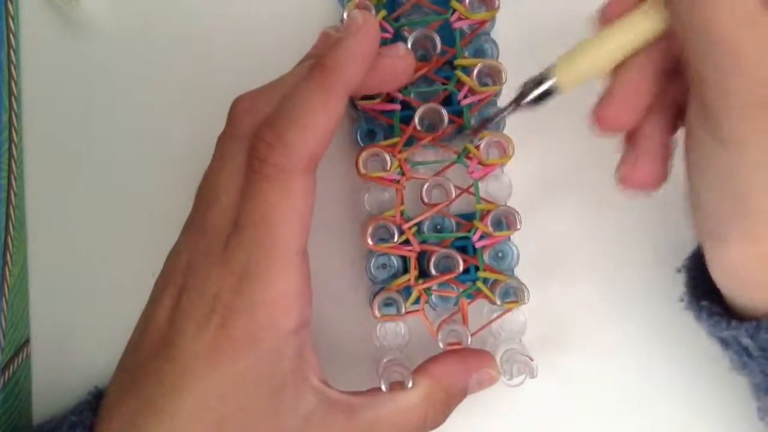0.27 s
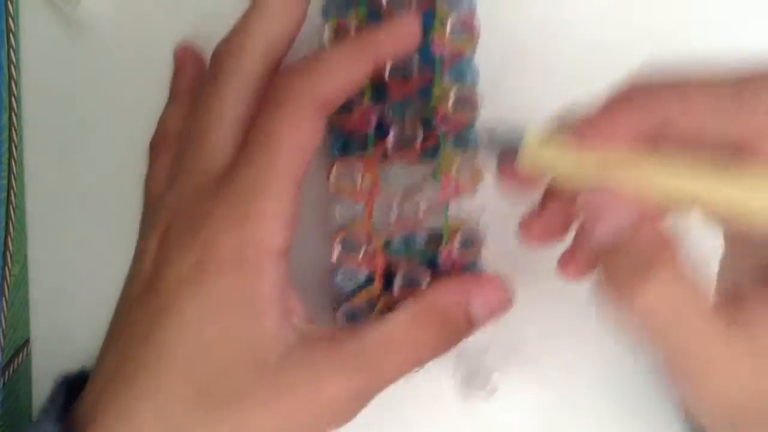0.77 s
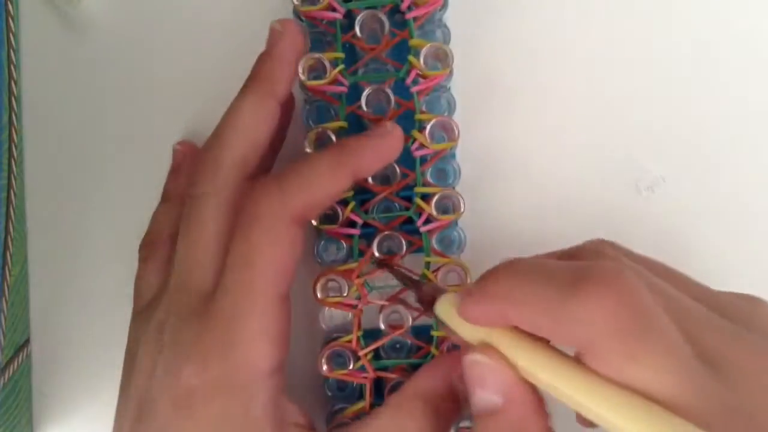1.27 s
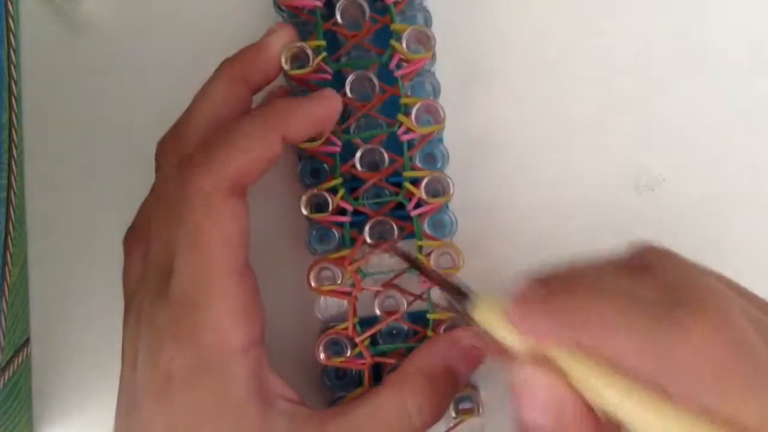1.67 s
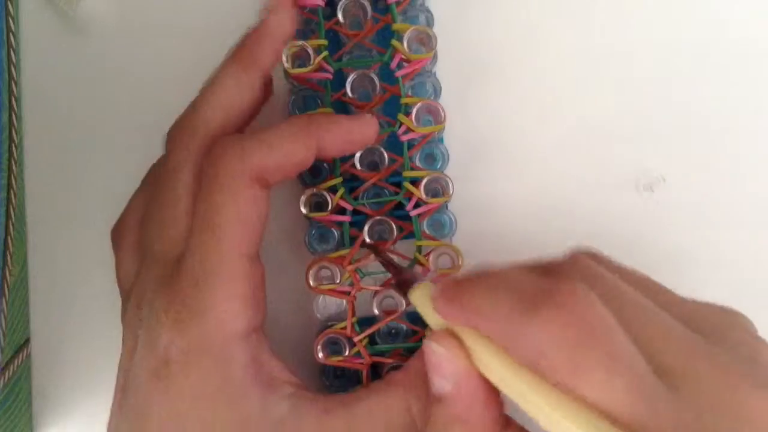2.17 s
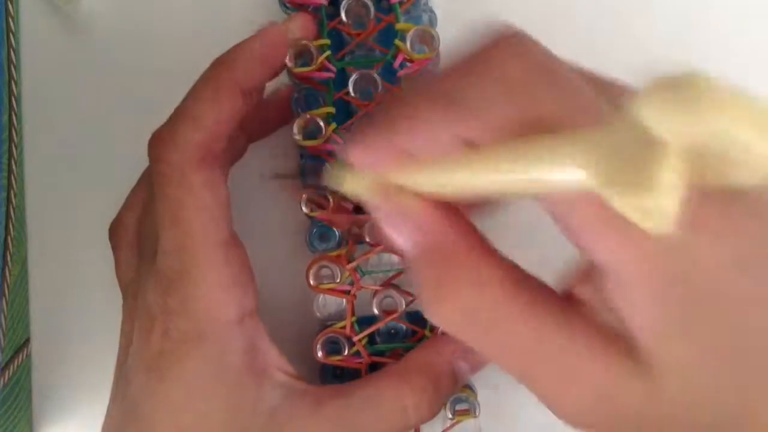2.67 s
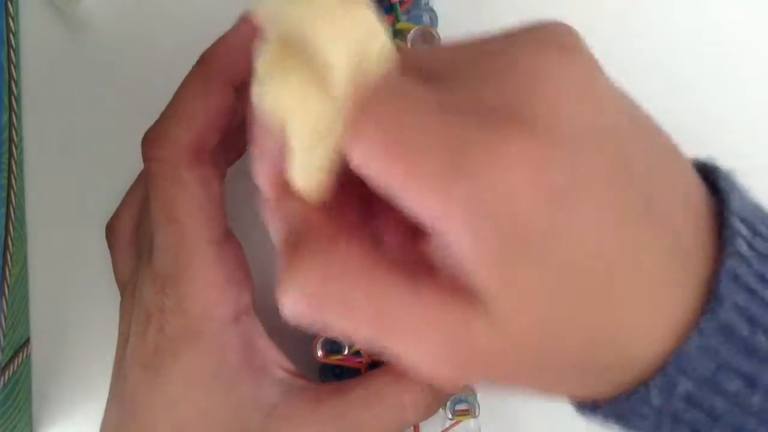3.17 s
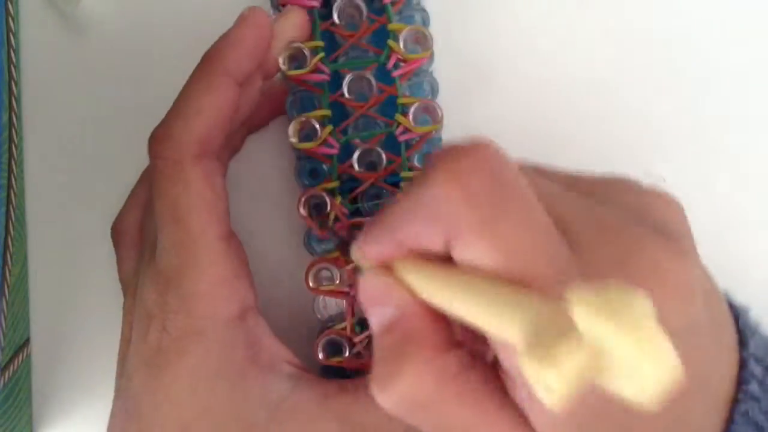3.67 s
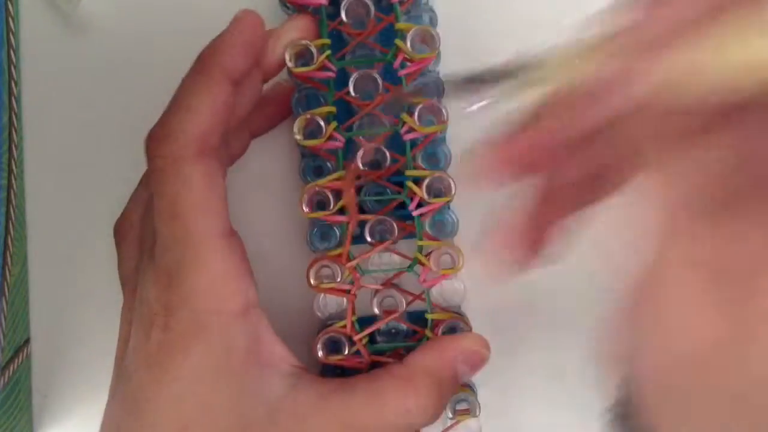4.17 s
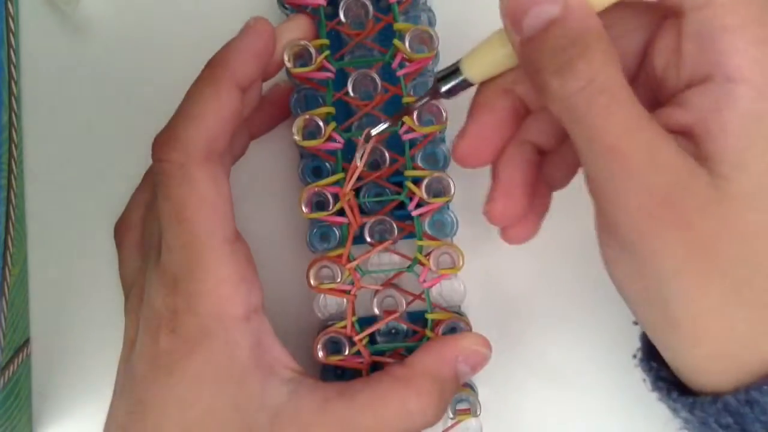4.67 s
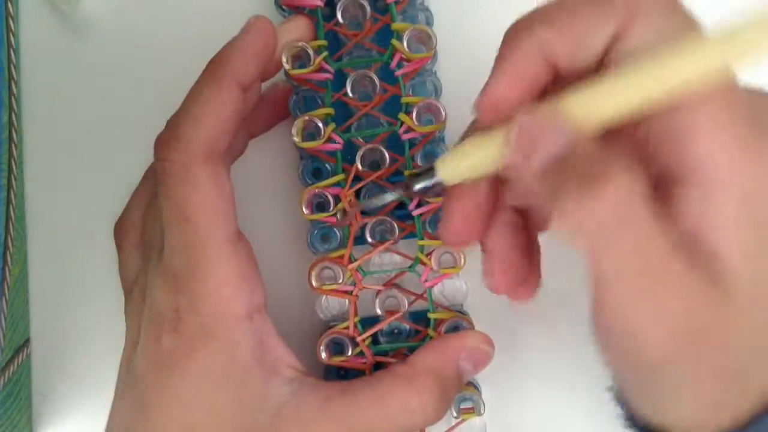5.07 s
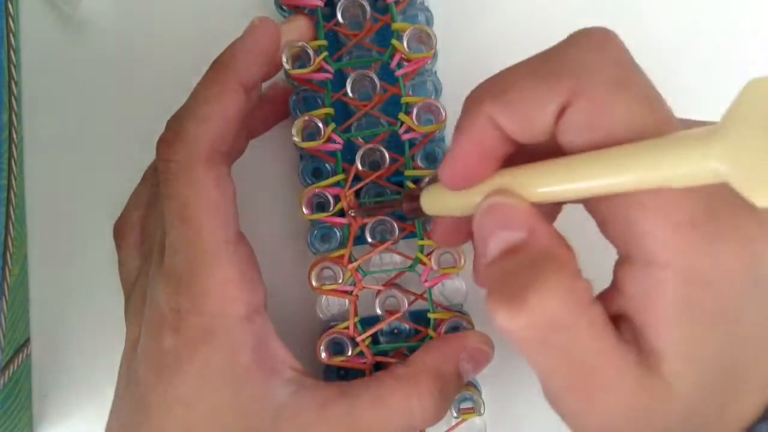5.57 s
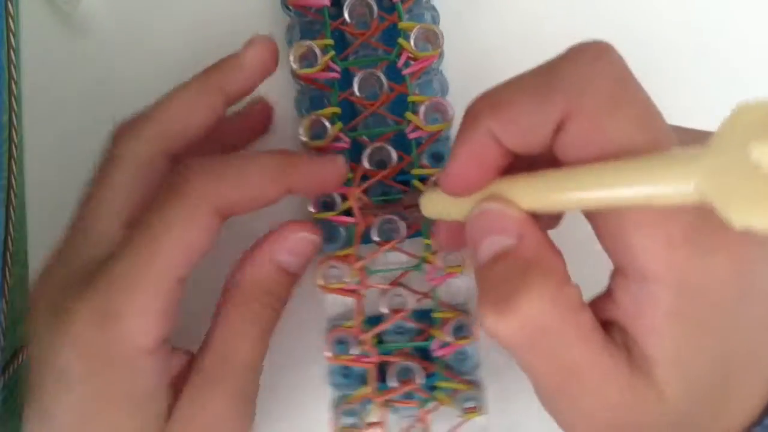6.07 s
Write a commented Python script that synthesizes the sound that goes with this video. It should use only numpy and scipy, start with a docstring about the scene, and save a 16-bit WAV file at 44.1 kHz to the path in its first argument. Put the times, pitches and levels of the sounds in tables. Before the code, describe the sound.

A metal hook works rubber bands over the pins of a plastic loom, close by in a quiet room with a faint hiss and hum. Small clicks come at 0.2 and 0.3 seconds. The loom knocks and rattles on the table between 0.3 and 0.7 seconds and scrapes along in two short shoves, ending around 1 second. Light, uneven clicks follow, each with a brief plastic ring, clearer at 1.5 and 1.8 seconds. The loudest sound, a sharp snap, comes at 2.7 seconds. Further distinct clicks land near 3.1, 3.7, 4.1 and 4.9 seconds, with softer ticks between. Fingers rub the plastic very faintly, and a sleeve brushes past around 0.6, 2.6 and 3.6 to 3.9 seconds. After a short lull, the loom rocks on the table with three hollow, rattling knocks between 5.8 and 6.2 seconds.

```python
"""In a quiet room, at a table, a metal hook lifts rubber bands over the pins of a plastic loom.
Hook and bands click on the pins and set the loom ringing. The loom knocks and rocks on the table
when the hand changes grip, and scrapes as it is pushed along in two shoves. Fingers rub the plastic
and a sleeve brushes past. A faint hum and hiss lie underneath."""
import sys
import numpy as np
from scipy import signal
from scipy.fft import rfft, irfft, next_fast_len
from scipy.io import wavfile
from scipy.ndimage import uniform_filter1d

SR = 44100
rng = np.random.default_rng(int(sys.argv[2]) if len(sys.argv) > 2 else 0)


def unload_wav(signal):
    """Save mono or channel-first audio to the path in sys.argv[1] as 16-bit WAV at rate SR, clipped to [-1, 1]."""
    wavfile.write(
        sys.argv[1],
        SR,
        np.round(np.clip(np.atleast_2d(signal).T, -1, 1) * 32767).astype(np.int16),
    )


N = 278712
NOW = np.arange(N) / SR   # seconds through the scene
RING = np.arange(SR // 3) / SR   # seconds through one blow

# A mode is a tone that a struck thing rings at; ring_s is the time it takes to fade by 60 dB.
# modes of the loom's bending body: pitch_hz, level_db, ring_s
BODY_MODES = [(298.6, -4.5, 0.2), (360, -2, 0.057), (375, -5, 0.13), (430, -3.5, 0.059), (469.3, -5, 0.11),
              (498.3, -3, 0.12), (612, -7.5, 0.11), (668.4, -3.5, 0.197), (774, 4, 0.036)]
# modes of the loom's ribs and pin strips: pitch_hz, level_db, ring_s
RIB_MODES = [(780.3, -10, 0.094), (821, -9.5, 0.09), (958, -2.5, 0.017), (1057.5, -3.5, 0.032),
             (1069.3, -6.5, 0.11), (1159.5, -6, 0.04), (1306, -2, 0.026), (1412, -2, 0.031),
             (1537, -17, 0.08), (1579, 0, 0.027), (1800, -7.5, 0.079)]


def from_db(db):
    """Turn decibels into a number to multiply a sound by."""
    return 10 ** (np.asarray(db) / 20)


def rms_one(x):
    """Scale a sound so that its average strength (rms) is 1."""
    return x / np.sqrt(np.mean(x ** 2) + 1e-20)


def unit_blow(x):
    """Scale a blow so that its loudest 2 ms have the power of a sine wave of height 1."""
    return x / np.sqrt(2 * uniform_filter1d(x ** 2, size=88).max() + 1e-20)


def at_hz(points, hz):
    """Read between the rows of a table, giving each octave equal space."""
    pitches, values = np.transpose(points)
    return np.interp(np.log(np.maximum(hz, 1)), np.log(pitches), values)


def coloured(x, spectrum):
    """Make each pitch range as strong as the spectrum table says; rms 1."""
    size = next_fast_len(len(x))
    gains = from_db(at_hz(spectrum, np.fft.rfftfreq(size, 1 / SR)))
    return rms_one(irfft(rfft(x, size) * gains, size)[:len(x)])


def noise(spectrum, size):
    """Random noise shaped by a spectrum table; rms 1."""
    return coloured(rng.standard_normal(size), spectrum)


def dying(ring_s):
    """The fade of a blow: 60 dB down after ring_s."""
    return from_db(-60 * RING / max(ring_s, 1e-3))


def add(out, start_s, sound):
    """Mix a sound in at its start time."""
    start = max(round(start_s * SR), 0)
    out[start:start + len(sound)] += sound[:max(N - start, 0)]


def struck(modes, favoured_hz, focus_db, damping=1):
    """The spot that is hit favours one pitch; modes lose focus_db for each octave away from it."""
    hz, db, ring_s = np.transpose(modes)
    db = db - focus_db * np.abs(np.log2(hz / favoured_hz)) + rng.standard_normal(len(hz))
    hz = hz * (1 + 0.0074 * rng.standard_normal(len(hz)))   # fingers and bands detune it a little
    strengths = from_db(db) * rng.choice([-1, 1], len(hz))
    tones = (strength * np.sin(2 * np.pi * pitch * RING) * dying(seconds / damping)
             for strength, pitch, seconds in zip(strengths, hz, ring_s))
    return unit_blow(sum(tones))


def burst(spectrum, ring_s):
    """A contact wakes a crowd of short tones that blur into fading noise."""
    return unit_blow(noise(spectrum, len(RING)) * dying(ring_s))


def slips(per_s, spread_db):
    """Rubbing surfaces stick and slip: tiny, uneven jolts at random moments."""
    moments = rng.random(N) < per_s / SR
    return moments * from_db(spread_db * rng.standard_normal(N)) * rng.choice([-1, 1], N)


def swells(strokes, lag_s=0):
    """Each stroke speeds up and slows down; it stays above half strength for length_s."""
    return sum(from_db(db) * .5 ** ((2 * (NOW - middle_s - lag_s) / length_s) ** 2)
               for middle_s, length_s, db in strokes)


def friction(jolts, favoured_hz, rib_db):
    """A stream of jolts keeps the loom's body and ribs ringing; rms 1."""
    body = struck(BODY_MODES, favoured_hz, focus_db=16)
    ribs = from_db(rib_db) * struck(RIB_MODES, favoured_hz, focus_db=8)
    return rms_one(signal.fftconvolve(jolts, body + ribs)[:N])


def hiss_and_hum():
    """The still room: an even hiss and a low, wavering hum."""
    # spectrum of the hiss: pitch_hz, level_db
    hiss_spectrum = [(15, -83.5), (25, -30.5), (53, -18.5), (69, -37), (129, -15), (144, -9.5), (160, -8.5),
                     (215, -11.5), (274, -17), (1270, -25), (1850, -26), (4150, -26.5), (4750, -26.5),
                     (10600, -27), (15500, -29.5)]
    # tones of the hum: pitch_hz, waver_hz, level_db
    hum_tones = [(81.2, 2.4, -80.5), (163.3, 6.5, -76), (206, 3.2, -77)]
    hiss = noise(hiss_spectrum, N)
    above_hum = signal.sosfilt(signal.butter(2, 300, "high", fs=SR, output="sos"), hiss)
    out = from_db(-69.5) * hiss / np.std(above_hum)   # the part above 300 Hz sets the level
    for hz, waver_hz, db in hum_tones:
        waver = noise([(1, 0), (waver_hz, -3), (waver_hz * 4, -30), (400, -90)], N)
        out += from_db(db) * rms_one(np.sin(2 * np.pi * hz * NOW + 0.46 * waver))
    return out


def clicks():
    """A band or the hook slips off a pin: a crack, the pin's brief ring, and the loom sounding below."""
    # snaps on the pins: start_s, level_db, pitch_hz, loom_db, rib_db, crack_db
    # loom_db and crack_db turn those parts up against the pin; rib_db tips the loom from body to ribs
    snaps = [(0.171, -35, 4600, -18.5, -13, 0.5), (0.1909, -33, 4130, -15, -13, -11),
             (0.3244, -26, 3640, -13, -13, -11), (1.2161, -38.5, 3260, -14, -9.5, -33),
             (1.4431, -54.5, 3320, -2, -4, -3), (1.4636, -31.5, 4330, -24, -1, -15.5),
             (1.4739, -31.5, 4400, -15, -3, -14), (1.6592, -67.5, 2860, 3.5, 1, -9),
             (1.7854, -28.5, 3830, -8.5, -3, -7), (1.8295, -50.5, 4290, -9.5, -5, -4),
             (1.8552, -46, 4150, -11, -4.5, -10), (2.0479, -46, 3860, -9.5, -10, -5.5),
             (2.1686, -41, 4160, -11.5, -7.5, -13.5), (2.3099, -51.5, 3750, -7.5, -6.5, -22),
             (2.385, -53.5, 4030, -9, 3.5, -11.5), (2.5092, -49.5, 3200, -18, 11, -23),
             (2.6587, -12, 5010, -20.5, 3, -17.5), (2.8983, -48.5, 3300, -17.5, 5.5, -30),
             (3.053, -25.5, 3200, -25.5, 5.5, -30), (3.111, -36.5, 4350, -9.5, -6, -13),
             (3.242, -43, 3200, -15.5, 6.5, -12), (3.266, -40, 3530, -17.5, 2.5, -23),
             (3.3361, -40, 4800, -6, -6, 2), (3.369, -48, 3100, -5, -8.5, -12),
             (3.476, -49, 4130, -10.5, -3.5, -13), (3.746, -23, 2650, -6.5, 5, -7),
             (4.08, -28.5, 3540, -15, 4.5, -7.5), (4.1128, -28.5, 3250, -13, -0.5, -14.5),
             (4.1687, -39.5, 4170, -16, 3, -8), (4.6158, -45, 4060, -13, 1, -11),
             (4.805, -43, 4630, -8.5, -12, -5.5), (4.8536, -63.5, 3310, 2.5, 4.5, -10),
             (4.92, -21.5, 4500, -17.5, -4, -7), (5.832, -47, 3610, -14, 4.5, -1.5),
             (6.227, -34, 2840, -11, 19, -22)]
    # modes of the hook and pins: pitch_hz, level_db, ring_s
    pin_modes = [(2550, 4, 0.0051), (2586, -43, 0.0201), (2987, -5.5, 0.034), (3150, -4, 0.027),
                 (3430, -3, 0.035), (4167, 3, 0.03), (4344, -5, 0.051), (5090, -10.5, 0.0028),
                 (5170, -0.5, 0.029), (5760, 3.5, 0.0095), (6300, -15, 0.014), (7350, -28.5, 0.021)]
    # spectrum of the pins' crowd of short tones: pitch_hz, level_db
    pin_crowd = [(1200, -23), (2100, -15), (3200, -1), (4300, -4), (5500, -2.5), (6200, -8.5), (7400, -12),
                 (8500, -23.5), (12000, -15.5)]
    # spectrum of the sharp crack: pitch_hz, level_db
    crack_spectrum = [(1500, -17), (3500, -21.5), (7000, 7), (8500, 0), (11000, -3.5), (14000, 3.5),
                      (16000, -15)]
    # spectrum of the ribs' crowd of short tones: pitch_hz, level_db
    rib_crowd = [(300, -11), (750, 2), (1350, -2), (1800, -7), (3000, -7), (8000, -44)]
    usual_snap_db, db_per_octave = -40, 45
    letting_go = 1 - np.exp(-RING / 0.00016)
    out = np.zeros(N)
    for start_s, db, pin_hz, loom_db, rib_db, crack_db in snaps:
        body_hz = 375.2 * 2 ** ((db - usual_snap_db) / db_per_octave)   # harder snaps wake higher modes
        rib_hz = 1220 * 2 ** (rib_db / db_per_octave)   # so do snaps nearer the stiff ribs
        pin = struck(pin_modes, pin_hz, focus_db=28, damping=1.8)
        pin += from_db(-4) * burst(pin_crowd, ring_s=0.018)
        crack = 1.7 * burst(crack_spectrum, ring_s=0.02)
        ribs = 2.03 * struck(RIB_MODES, rib_hz, focus_db=32, damping=0.62)
        ribs += from_db(4) * burst(rib_crowd, ring_s=0.052)
        body = 1.54 * struck(BODY_MODES, body_hz, focus_db=17.5, damping=1.35)
        loom = from_db(rib_db / 2) * ribs + from_db(-rib_db / 2) * body
        click = pin + from_db(crack_db) * crack + from_db(loom_db) * loom
        add(out, start_s, from_db(db) * click * letting_go)
    return out


def foot_tap(body_hz, hardness_db):
    """A loom foot hits the table: the body rings; a hard hit adds ringing ribs and rattling pin strips."""
    # spectrum of the rattling pin strips: pitch_hz, level_db
    rattle_spectrum = [(200, 0), (600, -1), (1500, 14), (2200, 11.5), (3500, 5.5), (6000, -11),
                       (15000, -11)]
    body = struck(BODY_MODES, body_hz, focus_db=10.5, damping=1.4)
    ribs = struck(RIB_MODES, favoured_hz=765, focus_db=15)
    rattle = from_db(-12.5) * burst(rattle_spectrum, ring_s=0.068)
    return body + from_db(hardness_db) * (ribs + rattle)


def knocks():
    """The loom thuds on the table and rocks from foot to foot, each tap weaker and softer than the last."""
    # the loom being set down: start_s, level_db, pitch_hz, hardness_db, tap_count
    landings = [(0.336, -29.5, 760, -2, 1), (0.459, -23, 470, -0.5, 5), (0.7, -30.5, 660, -2.5, 2),
                (0.985, -48, 430, -19, 1), (1.368, -52, 315, -18, 2), (3.602, -51.5, 680, -33, 2),
                (5.319, -51.5, 457, -19, 1), (5.8289, -29.5, 566, -4, 3), (6.046, -39.5, 366, -8.5, 3),
                (6.226, -28.5, 510, -1.5, 3)]
    # modes of the table top: pitch_hz, level_db, ring_s
    table_modes = [(142, -13.5, 0.35), (178.5, -8, 0.34), (237.7, -10.5, 0.23)]
    gap_s, weaker_db, softer_db = 0.0125, 1.55, 2   # from one tap to the next
    out = np.zeros(N)
    for start_s, db, body_hz, hardness_db, tap_count in landings:
        thud_db = db - 16.5 - 0.68 * hardness_db   # a softer landing has more thud
        add(out, start_s, from_db(thud_db) * struck(table_modes, favoured_hz=190, focus_db=11))
        for k in range(round(tap_count)):
            uneven = min(k, 1) * rng.uniform(-.2, 0.193)   # the first tap is on time
            tap = foot_tap(body_hz, hardness_db - softer_db * k)
            add(out, start_s + gap_s * (k + uneven), from_db(db - weaker_db * k) * tap)
    return out


def fingers():
    """Skin sticks and slips on the loom, most of all when the hand takes a new grip."""
    # changes of grip: middle_s, length_s, level_db
    grips = [(0.39, 0.28, -68), (1.42, 0.14, -66.5), (3.65, 0.18, -68), (4.8, 0.2, -78),
             (5.97, 0.21, -64.5)]
    holding = from_db(-83)   # fingers are never quite still
    rubbing = friction(slips(per_s=150, spread_db=6), favoured_hz=369, rib_db=-5)
    return (holding + swells(grips)) * rubbing


def shoves():
    """The loom slides along the table with a gritty hiss, and judders most as it slows."""
    # pushes along the table: middle_s, length_s, level_db
    pushes = [(0.55, 0.22, -58), (0.83, 0.22, -51.5)]
    # spectrum of the sliding hiss: pitch_hz, level_db
    grit_spectrum = [(400, -8.5), (900, 2.5), (1500, -4), (2100, -7), (3200, -5.5), (4700, -13),
                     (7000, -12.5), (10000, -16.5), (15500, -16.5)]
    judder = friction(slips(per_s=820, spread_db=-0.5), favoured_hz=490, rib_db=-7.5)
    grit = coloured(slips(per_s=6100, spread_db=2.5), grit_spectrum)
    return from_db(-0.5) * swells(pushes, lag_s=0.04) * judder + swells(pushes) * grit


def sleeve():
    """Hand and sleeve brush past in soft swells of noise."""
    # brushing strokes: middle_s, length_s, level_db
    brushes = [(0.6, 0.5, -64.5), (2.56, 0.24, -66), (3.61, 0.14, -68), (3.91, 0.1, -68)]
    cloth = noise([(300, -15), (1500, 0.5), (6000, -0.5), (11000, -1.5), (15000, -7.5)], N)
    return swells(brushes) * cloth


def room(x, tail_db, early_db):
    """Near surfaces throw the sound back at once; then each octave of the echo fades at its own pace."""
    # how long the echo lasts: pitch_hz, ring_s
    echo_times = [(200, 0.8), (530, 0.2451), (1400, 0.53), (4000, 0.3748), (8000, 0.3), (15000, 0.4)]
    # spectrum of the echo: pitch_hz, level_db
    echo_spectrum = [(150, 2), (500, 7.5), (1300, -1), (2300, -7), (4500, -5), (8000, -2), (15000, -14.5)]
    t = np.arange(SR * 3 // 4) / SR
    hz = np.fft.rfftfreq(len(t), 1 / SR)
    white = rfft(rng.standard_normal(len(t))) / np.sqrt(SR)
    early = from_db(early_db) * np.exp(-t / 0.0098)
    echo = 0
    for centre_hz in 125 * 2. ** np.arange(8):
        octave = np.maximum(1 - np.abs(np.log2(np.maximum(hz, 1) / centre_hz)), 0)
        band = irfft(white * octave, len(t)) * from_db(at_hz(echo_spectrum, centre_hz))
        late = from_db(tail_db - 60 * t / at_hz(echo_times, centre_hz))
        echo = echo + band * (late + early)
    arrival = np.clip((t - .003) / 0.0015, 0, 1)   # nothing comes back for the first 3 ms
    return x + signal.fftconvolve(x, echo * arrival)[:N]


def scene():
    """Clicks, knocks and rubbing echo in the room, over its hiss and hum."""
    loom = from_db(-2) * clicks() + from_db(-1.5) * knocks() + shoves() + fingers() + sleeve()
    bass_cut = signal.butter(3, 130, "high", fs=SR, output="sos")   # a small body gives off little bass
    in_room = room(signal.sosfilt(bass_cut, loom), tail_db=5.0, early_db=10.5)
    return (in_room + hiss_and_hum())[None]


def record(dry):
    """A small microphone loses the deep bass; the highest treble is cut off."""
    bass_cut = signal.butter(2, 45, "high", fs=SR, output="sos")
    treble_cut = signal.ellip(10, .1, 80, 15500, fs=SR, output="sos")
    return signal.sosfilt(treble_cut, signal.sosfilt(bass_cut, dry))


dry = scene()
out = record(dry)
unload_wav(out)
```